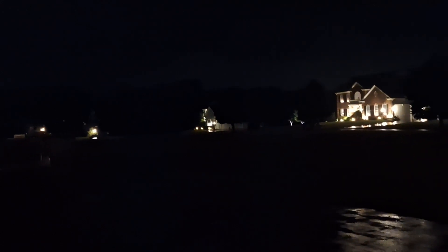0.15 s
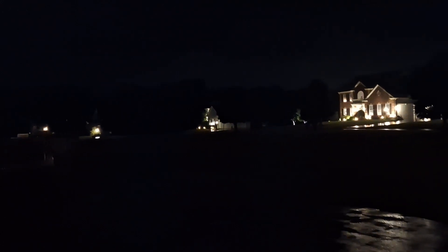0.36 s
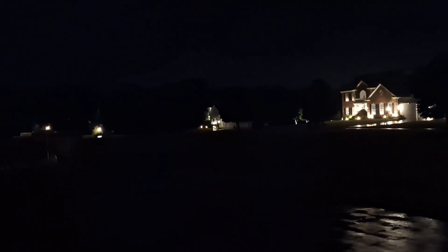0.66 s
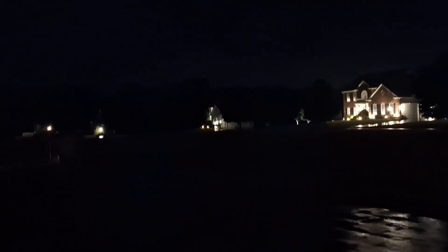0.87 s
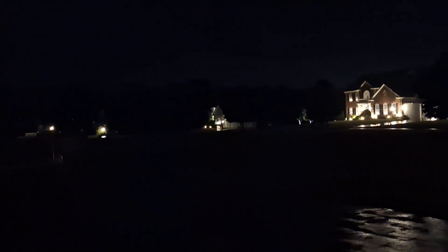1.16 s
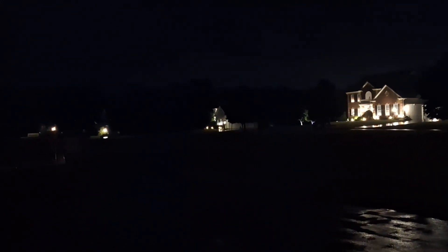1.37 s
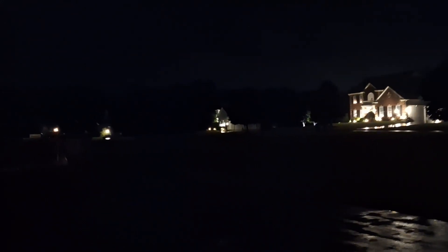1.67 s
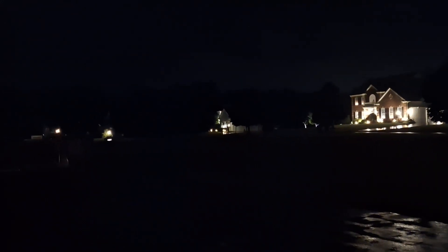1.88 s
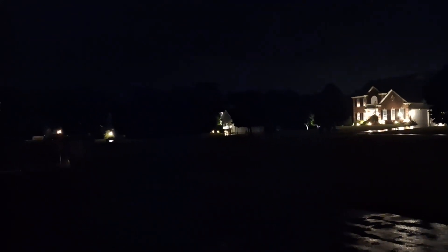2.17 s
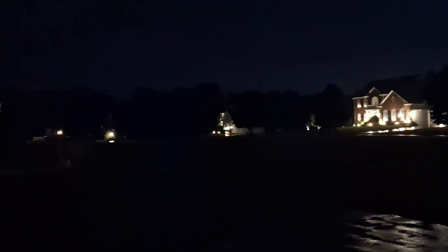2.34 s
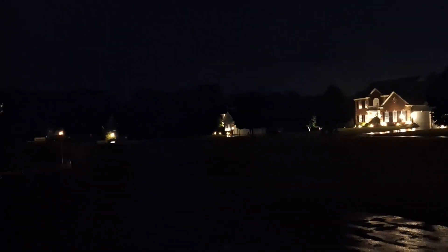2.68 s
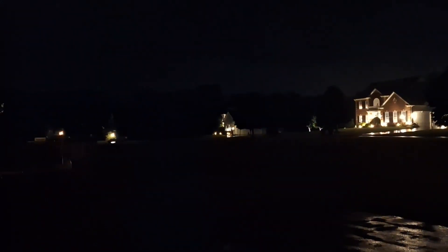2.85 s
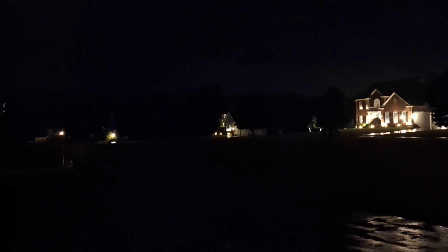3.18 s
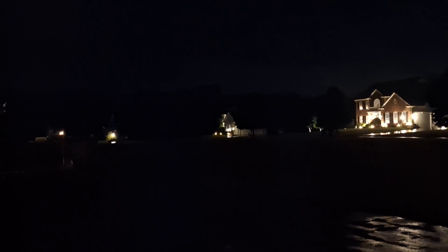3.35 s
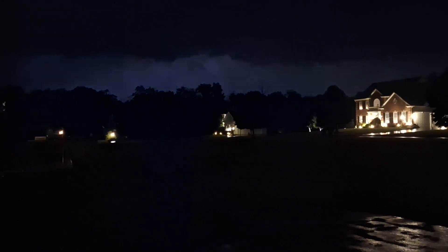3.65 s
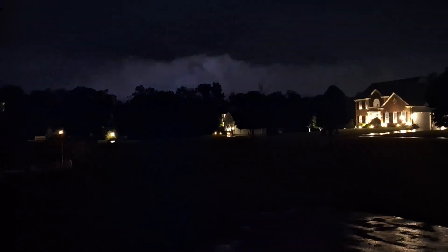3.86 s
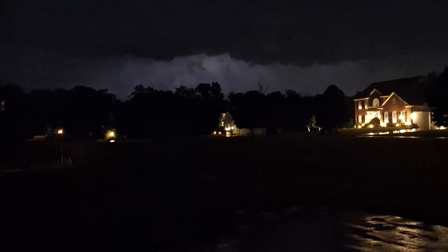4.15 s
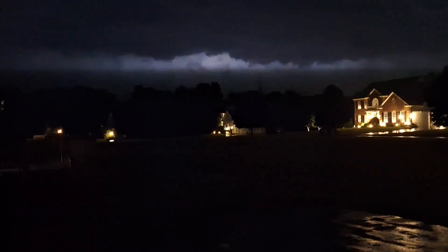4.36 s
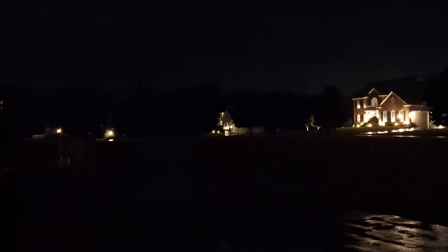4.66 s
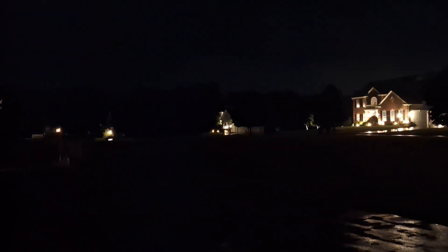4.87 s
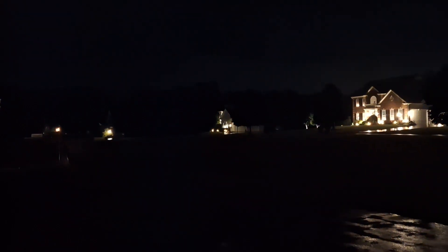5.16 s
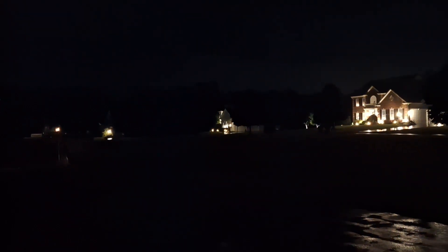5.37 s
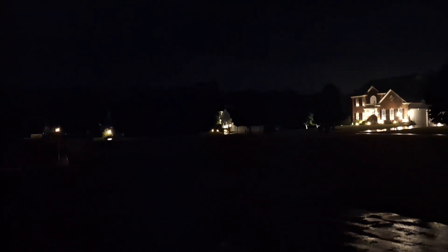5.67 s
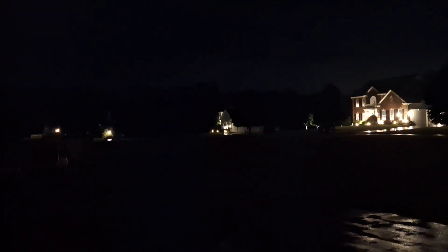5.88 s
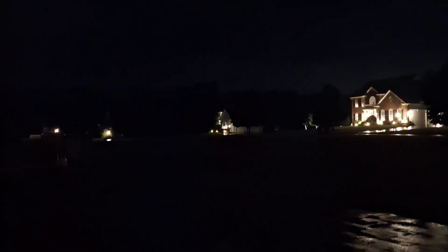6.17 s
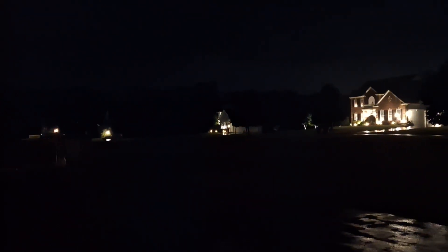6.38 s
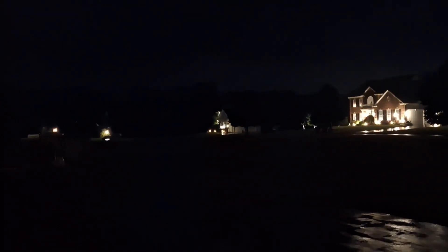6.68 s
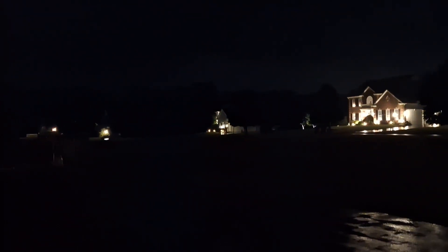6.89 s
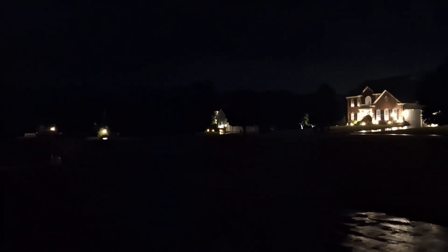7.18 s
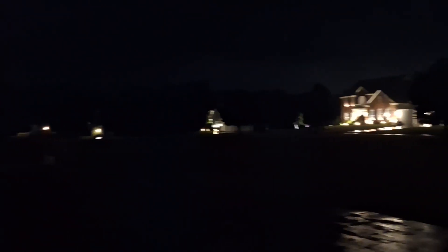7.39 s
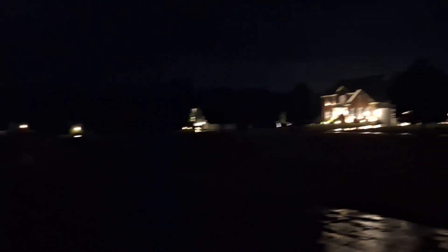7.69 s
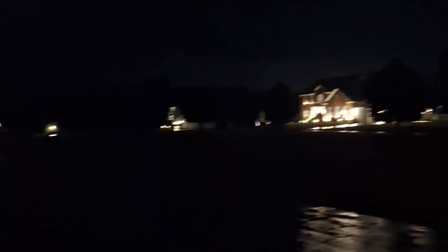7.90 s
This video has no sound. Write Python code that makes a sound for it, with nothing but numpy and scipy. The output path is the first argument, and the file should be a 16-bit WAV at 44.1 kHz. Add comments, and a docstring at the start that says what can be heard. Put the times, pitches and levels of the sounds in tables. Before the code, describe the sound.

Light rain drips close by over pulsing night crickets and a faint low rumble, then a heavy thunder roll booms and fades.

```python
"""On a porch at night in light rain: near drips over a soft wash, crickets in the grass, thunder.
Thunder is filtered noise: a far grumble, then a nearer roll with heavy booms shaped as short pulses.
Each drip, knock or rattle is a tick and a pitched noise burst; the rain is patchy noise with flashes.
Crickets are whistles, part clean and part blurred, cut into wing strokes.
The microphone has two ports facing different ways, which colour the treble differently."""
import sys
import numpy as np
from scipy import signal
from scipy.fft import rfft, irfft
from scipy.io import wavfile
from scipy.ndimage import uniform_filter1d

SR = 44100
rng = np.random.default_rng(int(sys.argv[2]) if len(sys.argv) > 2 else 0)


def wrap_up_sound(samples):
    """Save the sound to the file named by the first command line argument, as 16-bit audio."""
    columns = np.atleast_2d(samples).T
    # keep every value between -1 and 1, then stretch to whole-number steps
    tamed = np.clip(columns, -1, 1)
    steps = np.round(tamed * 32767).astype(np.int16)
    wavfile.write(sys.argv[1], SR, steps)


N = 354367
TIME = np.arange(N) / SR  # seconds


def gain_of(db):
    """Turns decibels into an amplitude gain."""
    return 10 ** (np.asarray(db) / 20)


def evened(x):
    """Scales a signal to rms 1."""
    return x / np.sqrt(np.mean(x ** 2) + 1e-20)


def read_curve(points, hz):
    """Reads a curve over frequency, straight between its points on a log-frequency axis."""
    point_hz, value = np.transpose(points)
    return np.interp(np.log(hz + 1), np.log(point_hz + 1), value)


def follow(rows):
    """Gives one value a sample for every column of a curve over time."""
    s, *columns = np.transpose(rows)
    return [np.interp(TIME, s, column) for column in columns]


def panned(left_minus_right_db):
    """Left and right gains; the right port stays at 1."""
    return gain_of(np.array([left_minus_right_db, 0 * left_minus_right_db]))


def resonate(x, hz, width_hz):
    """Resonance at one pitch: shifts hz down to zero, smooths twice and shifts back."""
    turn = np.exp(2j * np.pi * np.cumsum(hz * np.ones(x.shape[-1])) / SR)
    r = np.exp(-np.pi * width_hz / SR)
    lowered = x * turn.conj() + 1e-18
    smooth = signal.lfilter([(1 - r) ** 2], [1, -2 * r, r * r], lowered)
    return 2 * (turn * smooth).real


# How alike the two ports hear spread-out sound: pitch_hz, likeness (0-1)
PORT_LIKENESS = [(40, 0.96), (130, 0.98), (215, 0.89), (350, 0.95), (520, 0.78), (700, 0), (1100, 0.27),
                 (2500, 0), (16000, 0.06)]


def noise(spectrum, patchy_db, lo_hz=0, hi_hz=SR, size=N):
    """Two-port noise of rms 1 from random short-time spectra, with patches over time and pitch."""
    frames = size // 512 + 5
    hz = np.fft.rfftfreq(2048, 1 / SR)
    hz = hz[hz <= min(spectrum[-1][0], 3 * hi_hz)]
    a, b, c, d, patches = rng.standard_normal((frames, len(hz), 5), dtype=np.float32).T
    patches = uniform_filter1d(patches, size=20, axis=0)
    patches = evened(uniform_filter1d(patches, size=6, axis=1))
    same = np.clip(read_curve(PORT_LIKENESS, hz), 0, 1)[:, None]
    right = a + 1j * b
    left = same * right + np.sqrt(1 - same ** 2) * (c + 1j * d)
    band = 1 / np.sqrt((1 + (lo_hz / (hz + 1)) ** 12) * (1 + (hz / hi_hz) ** 12))
    colour = band[:, None] * gain_of(read_curve(spectrum, hz)[:, None] + patchy_db * patches)
    z = np.zeros((2, 1025, frames), np.complex64)
    z[:, :len(hz)] = np.array([left, right]) * colour
    sound = signal.istft(z, nperseg=2048, noverlap=1536)[1]
    return evened(sound[:, :size].astype(float))


# Colour of the far thunder: pitch_hz, level_db (relative, per Hz)
FAR_COLOUR = [(15, -51), (25, -16), (36, -7), (48, 0), (60, 1), (85, -7.5), (125, -12), (147, -20),
              (213, -21), (270, -26), (362, -23.5), (472, -31.5), (600, -34.5), (780, -55)]
FAR_DB, FAR_SWELL_DB = -50, 1


def far_grumble():
    """Low noise whose level swells at random, with four turning points a second."""
    swell = evened(np.interp(TIME, np.arange(40) / 4, rng.standard_normal(40)))
    return gain_of(FAR_DB + FAR_SWELL_DB * swell) * noise(FAR_COLOUR, patchy_db=0.0)


# Colour of the near roll, with the ring of the porch: pitch_hz, level_db (relative, per Hz)
NEAR_COLOUR = [(13, -43), (22, -23), (45, -7.5), (74, 3), (97, -6.5), (120, 0.5), (162, -17.5), (223, -3.5),
               (245, -17), (279, -19), (384, -15.5), (436, -25), (480, -22.5), (660, -32), (1000, -44.5),
               (1300, -51), (2200, -120)]
# Course of the near roll before lumps and claps:
# start_s, deep_db, middle_db (against deep), crackle_db (against deep)
NEAR_ROLL = [(5.4, -68, 3, -24), (5.73, -53, -10, -9.5), (6.05, -42.5, -4.5, -3.5), (6.07, -37, -1.5, -1),
             (6.22, -34.5, -3.5, -2.5), (6.27, -33.5, -6, -9.5), (6.4, -40, -8.5, -4.5),
             (6.7, -30, -6, -19), (6.84, -37.5, -9, -9.5), (7.0, -35, -4, -13), (7.18, -39, -13, -13),
             (7.22, -45.5, -6, -6), (7.34, -41.5, -10.5, -14.5), (7.72, -42.5, -7.5, -12),
             (8.04, -50.5, -5, -10.5)]
# Single shock fronts: start_s, level_db (peak), pitch_hz, cycles (count), clap_db (middle band)
SHOCK_FRONTS = [(6.075, -27.5, 109, 9, -32.5), (6.21, -27, 125, 2.4, -45), (6.30, -35, 70, 2.1, -53),
                (6.432, -23, 86, 5.7, -32), (6.491, -32, 96, 3.3, -39.5), (6.597, -23.5, 92, 1.9, -33),
                (6.632, -9.5, 95, 3, -25.5), (6.679, -23, 86, 2.4, -54), (6.722, -22.5, 74, 2.4, -44),
                (6.857, -17.5, 90.4, 4.7, -25.5), (6.924, -26, 100, 2.55, -42), (7.01, -22, 89, 5, -30.5),
                (7.053, -29, 93.5, 2.6, -46), (7.077, -28, 64, 2.1, -45), (7.256, -30.5, 75.5, 2, -41.5),
                (7.328, -31.5, 89, 6.3, -50), (7.41, -29.5, 80, 2.5, -53), (7.498, -35, 90, 3.5, -49),
                (7.634, -34, 85, 3, -50), (7.701, -32, 70, 2.4, -50), (7.811, -33.5, 96, 4.1, -44.5)]
CLAP_RISE_S, CLAP_T60_S = 0.0049, 0.31
CRACKLE_DB, CRACKLE_T60_S = -9, 0.46  # level against the clap
LUMPS_PER_S, LUMPS_DB = 30, 2


def near_roll():
    """Three noise bands swell in lumps; each shock front is a pulse with a brighter, dying clap."""
    start = round(NEAR_ROLL[0][0] * SR)
    t = TIME[start:]
    deep_db, middle_db, crackle_db = np.array(follow(NEAR_ROLL))[:, start:]
    middle_power = gain_of(deep_db + middle_db) ** 2
    crackle_power = gain_of(deep_db + crackle_db) ** 2
    fronts = np.zeros(len(t))
    for s, db, hz, cycles, clap_db in SHOCK_FRONTS:
        first = round(s * SR) - start
        span = slice(first, first + 20000)
        age = np.maximum(t[span] - s, 0)
        u = np.minimum(age * hz / cycles, 1)  # progress through the front, 0 to 1
        strength = np.sin(np.pi * u ** 0.69) ** 2.9  # strongest early
        fronts[span] -= gain_of(db) * strength * np.sin(2 * np.pi * cycles * u)
        onset = np.minimum(age / CLAP_RISE_S, 1)
        middle_power[span] += (onset * gain_of(clap_db - 60 * age / CLAP_T60_S)) ** 2
        crackle_power[span] += (onset * gain_of(clap_db + CRACKLE_DB - 60 * age / CRACKLE_T60_S)) ** 2
    roll = gain_of(deep_db) * noise(NEAR_COLOUR, 0, hi_hz=153, size=len(t))
    roll += np.sqrt(middle_power) * noise(NEAR_COLOUR, 0, lo_hz=158, hi_hz=278.5, size=len(t))
    roll += np.sqrt(crackle_power) * noise(NEAR_COLOUR, 0, lo_hz=298, size=len(t))
    # the lumps come in all bands at once
    lumps = rng.standard_normal(400)
    roll *= gain_of(LUMPS_DB * np.interp(t - t[0], np.arange(len(lumps)) / LUMPS_PER_S, lumps))
    fade_in = np.clip((t - t[0]) / 0.15, 0, 1)
    out = np.zeros((2, N))
    out[:, start:] = fade_in * roll + fronts
    return out


def thunder():
    """Far grumbling all through, with the nearer roll on top."""
    return far_grumble() + near_roll()


RISE_CYCLES = 1.7  # a strike takes this many cycles of its pitch to sound, at most those of 3000 Hz


def strike(db, hz, t60_s, splash, pan_db):
    """A sharp tick, then a burst ringing at one pitch with a broad splash, and a short porch tail."""
    t = np.arange(6000) / SR
    burst = rng.standard_normal((2, len(t)))
    f = np.fft.rfftfreq(len(t), 1 / SR)
    spray_colour = gain_of(read_curve(WASH_COLOUR, f)) * (f > 2000) * (f / 8000) ** 1.05
    spray = irfft(rfft(burst) * spray_colour)
    ring = resonate(burst, hz, 800 + 0.077 * hz)
    burst = evened(evened(ring) + splash * evened(spray))
    tick = 1.06 * np.exp(-t / 0.00052)
    # the tick is heard twice: direct and off the nearest wall
    shape = tick + 0.34 * np.roll(tick, round(0.0019 * SR))
    shape += 0.5 * gain_of(-60 * t / max(t60_s, 0.005))
    shape += gain_of(-21 - 60 * t / 0.3)  # porch tail
    shape *= np.sin(np.pi / 2 * np.minimum(t * max(hz, 3000) / RISE_CYCLES, 1)) ** 2
    shape *= signal.windows.tukey(2 * len(t), 0.3)[len(t):]  # fade-out
    return gain_of(db) * panned(pan_db)[:, None] * burst * shape


# Drips on hard ground close by: start_s, level_db, pitch_hz, splash (0-1), pan_db (left over right)
GROUND_DRIPS = [(.0205, -31.5, 5400, 0.27, -6), (0.0466, -41.5, 9400, 0.6, -3),
                (0.1367, -42, 11300, 0.6, -8.5), (0.176, -47.5, 6400, .7, 4), (.614, -47.5, 6160, .5, -11),
                (0.7665, -46, 6740, 1, -2), (1.0135, -44, 6100, 0.76, -3), (1.1393, -48, 9400, .8, 2),
                (1.252, -42, 5000, 0.2, -5), (1.5494, -39, 8900, 0.7, -5), (1.8947, -45, 10100, .3, -5),
                (2.002, -41, 9700, 1, 1), (2.4073, -40.5, 9800, .46, -10), (2.9608, -43.5, 10000, 0.8, 3),
                (3.144, -34.5, 9000, 0.63, -8), (3.1762, -47, 11100, .9, 2), (3.325, -33, 10040, 0.38, -4),
                (3.8661, -47, 9000, .5, -8), (4.145, -35, 6070, 0.6, -8), (4.377, -43.5, 10700, 0.7, 0),
                (4.8695, -40.5, 5870, 0.3, -7), (5.2197, -38.5, 9200, 0.5, -9),
                (5.234, -36.5, 6400, 0.8, -10), (5.3138, -46, 11000, 0.7, -3), (5.387, -43, 9650, 0.3, -7),
                (5.4809, -52, 9880, 1, 2), (6.0365, -46, 6340, 0.4, -3), (6.104, -44, 10200, 0, -3),
                (6.1505, -44, 5590, 0.6, 4), (6.1724, -46, 9300, .9, 3), (6.29, -47, 9370, .9, 0),
                (6.34, -33, 5400, 1, -7), (6.669, -36, 5600, 1, -2), (6.76, -47, 10100, .8, -12),
                (6.8435, -37, 5960, 0.2, -10), (6.98, -39.5, 10400, 0.5, -5),
                (7.5416, -36.5, 9200, 0.55, -6), (7.622, -33, 6530, 1, -5), (7.7276, -31.5, 5700, 0, -7),
                (7.8965, -39.5, 9630, 0.2, -11)]
# Hollow knocks, and longer rustles of something rattled by the thunder:
# start_s, level_db, pitch_hz, t60_s, splash (0-1), pan_db (left over right)
KNOCKS_AND_RATTLES = [(.6135, -43.5, 3820, 0.027, 0, -3), (5.2324, -39, 4150, 0.011, .1, -5),
                      (5.2547, -39, 4200, 0.083, 0.2, 2), (6.15, -44, 1740, 0.013, .6, 7),
                      (6.2347, -44.5, 1630, 0.0099, 0.2, 5.5), (6.3399, -31, 4600, 0.059, 0, 0),
                      (6.345, -52, 2320, 0.47, 0.1, 3.5), (6.357, -46.5, 1080, 0.26, 0, 0.5),
                      (6.69, -57, 1960, 0.35, 0.5, -3), (6.7668, -56.5, 2000, 0.36, .2, -5),
                      (7.515, -50, 4000, .06, .3, 0), (7.705, -46, 1980, 0.018, 0.2, 0),
                      (7.72, -35.5, 1395, 0.015, 0.33, -2)]
RING_CYCLES = 360  # a ground drip's ring dies 60 dB in this many cycles of its pitch
FAINT_PER_S, FAINT_DB, FAINT_HZ = 3, -50.5, 9740  # base level and pitch, spread at random


def drips_and_knocks():
    """Near drips, knocks and rattles sound one by one, and fainter drips land at random."""
    out = np.zeros((2, N + 6000))
    faint = []
    for a, b, c in rng.random((round(FAINT_PER_S * N / SR), 3)):
        # louder faint drips splash more
        faint.append((a * N / SR, FAINT_DB + 6 * b, FAINT_HZ * (0.994 + 0.085 * c), b, 0))
    ground = [(s, db, hz, RING_CYCLES / hz, splash, pan_db)
              for s, db, hz, splash, pan_db in [*GROUND_DRIPS, *faint]]
    for s, *row in [*ground, *KNOCKS_AND_RATTLES]:
        start = round((s + 0.00053) * SR)
        out[:, start:start + 6000] += strike(*row)
    return out[:, :N]


# Colour of the rain wash at the right port: pitch_hz, level_db (relative, per Hz)
WASH_COLOUR = [(300, 1), (500, 4), (850, 6.5), (1250, -3), (2100, -6), (2900, -2), (3500, 3.5), (5000, 2),
               (6400, 0.5), (7900, -14), (9300, -3), (10700, -6), (11800, -12.5), (13300, -20),
               (16000, -30)]
# Course of the upper wash, before a fixed 9.5 dB lift: start_s, level_db
FIZZ_COURSE = [(0, -68.5), (1.0, -70.5), (1.75, -70), (2.86, -70.5), (5.8, -69), (6.22, -64), (7.18, -68),
               (8.04, -67.5)]


def rain():
    """A patchy noise wash; small drops farther off flash up in wide bands of it."""
    low_wash = noise(WASH_COLOUR, patchy_db=2.0, hi_hz=1475) * gain_of(-64)
    fizz = noise(WASH_COLOUR, patchy_db=2.0, lo_hz=1410)
    t = np.arange(3000) / SR
    flash = gain_of(-60 * t / 0.15) * (1 - np.exp(-t / 0.0018))
    spray = noise(WASH_COLOUR, 0, lo_hz=2000)
    for lo_hz, hi_hz, db in ((2800, 12000, -10), (4850, 10900, -5.5), (8600, 21000, -13.5)):
        lands = rng.random(N) < 22 / SR  # about 22 drops a second in each band
        size = gain_of(3.0 * np.minimum(rng.exponential(1, N), 3)) * lands
        band = signal.butter(N=4, Wn=(lo_hz, hi_hz), btype="band", fs=SR, output="sos")
        flashes = signal.oaconvolve(size, flash)[:N] * signal.sosfilt(band, spray)
        fizz += gain_of(db) * evened(flashes)
    # the whole fizz stands some dB above its top octave
    return low_wash + gain_of(follow(FIZZ_COURSE)[0] + 9.5) * fizz


def singer(hz, width_hz, strokes_per_s, depth, clean, t=TIME):
    """A whistle, part clean and part blurred by distance, cut into wing strokes."""
    strokes = 1 - depth * (0.5 + 0.5 * np.cos(2 * np.pi * strokes_per_s * t))
    tone = np.sqrt(2) * np.sin(2 * np.pi * hz * t)
    blur = evened(resonate(rng.standard_normal((2, len(t))), hz, width_hz))
    return evened(strokes * (clean * tone + (1 - clean) * blur))


def phrases(rows, edge_s):
    """A gain that opens and closes with sloping edges for each phrase."""
    t = TIME[::64]
    gain = sum(gain_of(db) * np.clip(np.minimum(t - a, b - t) / edge_s, 0, 1) for a, b, db in rows)
    return np.interp(TIME, t, gain)


# Blurred cricket chorus, gain on two summed voices: start_s, level_db
CHORUS_COURSE = [(0, -64.5), (1.97, -62), (2.46, -65), (3.89, -61.5), (4.32, -66.5), (5.19, -61),
                 (5.55, -67.5), (6.0, -62), (6.67, -60.5), (7.09, -66), (7.61, -62), (8.04, -64.5)]


def chorus():
    """Two blurred, pulsing pitches stand for the crowd, stronger on the left."""
    crowd = singer(4433, 190, 35, 0.25, 0) + singer(4586, 210, 47, 0.26, 0)
    return gain_of(follow(CHORUS_COURSE)[0]) * panned(4.6)[:, None] * crowd


# Single crickets in front of the chorus, level before panning: start_s, end_s, level_db, pitch_hz
SOLO_PHRASES = [(.4, 0.715, -62, 4497), (.5, .85, -61.5, 4580), (.7, 0.997, -62, 4416),
                (1.802, 2.157, -59.5, 4625), (2.002, 2.45, -70, 4300), (2.944, 3.3, -65, 4650),
                (3.64, 4.185, -63, 4440), (4.47, 4.844, -64, 4590), (4.951, 5.3, -61.5, 4605),
                (5.859, 6.296, -59, 4600), (6.45, 6.95, -63.5, 4490), (7.35, 7.698, -70, 4600),
                (7.801, 8.1, -66, 4630)]
SOLO_PAN_DB = 10  # left over right


def solos():
    """Each phrase is one mostly blurred whistle with 44 strokes a second."""
    out = np.zeros((2, N))
    for a, b, db, hz in SOLO_PHRASES:
        span = slice(round(a * SR), round(a * SR) + 30000)
        voice = singer(hz, 56, 44, 0.37, clean=0.054, t=TIME[span])
        out[:, span] += phrases([(a, b, db)], 0.038)[span] * panned(SOLO_PAN_DB)[:, None] * voice
    return out


# Low trill, gain on two summed voices: start_s, end_s, level_db
TRILL_PHRASES = [(1.62, 3.72, -72.5), (5.08, 6.36, -70), (7.77, 8.1, -65)]


def low_trill():
    """Two close pitches share 56 strokes a second, one cut deeply and one lightly."""
    trill = singer(2560, 60, 56, 0.82, clean=0.6) + 0.82 * singer(2480, 80, 56, 0.32, clean=0.29)
    return phrases(TRILL_PHRASES, 0.14) * panned(-3.5)[:, None] * trill


# Short high chirps: start_s
CHIRP_STARTS = [.12, .6, 1.08, 1.55, 2.0, 2.42, 3.05, 3.75, 5.53, 6.2, 6.78, 7.45]
CHIRP_S, CHIRP_DB = 0.12, -65


def high_chirps():
    """Brief openings of one high whistle with 40 strokes a second."""
    chirps = [(s, s + CHIRP_S, CHIRP_DB) for s in CHIRP_STARTS]
    return phrases(chirps, 0.012) * singer(5670, 70, 40, 0.25, clean=0.43)


# Slowly pulsing cricket: start_s, end_s
TICKER_PHRASES = [(.05, .3), (.38, .95), (1.5, 1.7), (2.2, 2.35), (2.95, 3.22), (3.55, 3.8), (4.0, 4.1),
                  (4.45, 4.72), (4.9, 5.1), (5.37, 5.55), (5.6, 5.8), (6.2, 6.66), (7.23, 8.4), (7.75, 6.2)]
TICKER_DB = -66


def slow_ticker():
    """A mostly blurred high whistle with 26 strokes a second."""
    gain = phrases([(a, b, TICKER_DB) for a, b in TICKER_PHRASES], 0.03)
    return gain * singer(5325, 90, 26, 0.39, clean=0.08)


def crickets():
    """The chorus in the grass with single singers, a trill, chirps and a ticker."""
    return chorus() + solos() + low_trill() + high_chirps() + slow_ticker()


def scene():
    """Everything heard from the porch, before the microphone."""
    return thunder() + drips_and_knocks() + rain() + crickets()


# Left port against the right: pitch_hz, level_db
LEFT_COLOUR = [(60, 3), (220, 1.5), (520, 1.5), (1100, 0.5), (1900, -0.5), (2500, -6.5), (3600, -16.5),
               (4500, -14), (6400, -13.5), (7800, 3.5), (9400, -26), (11000, -12), (13000, -6.5),
               (15200, 10.5)]
# How far the left port lags: pitch_hz, lag_radians
LEFT_LAG = [(40, 0.31), (130, 0.58), (215, 0.25), (350, 0.7), (520, 1.11), (700, 2.15), (1100, 3.33)]
EDGE_HZ = 15780  # upper band limit


def record(dry):
    """The left port gets its colour and lag; deep bass is cut, hiss added, then the treble limited."""
    hz = np.fft.rfftfreq(4096, 1 / SR)
    response = gain_of(read_curve(LEFT_COLOUR, hz)) * np.exp(-1j * read_curve(LEFT_LAG, hz))
    port = np.roll(irfft(response), 2048) * np.hanning(4096)
    left = signal.oaconvolve(dry[0], port)[2048:2048 + N]
    bass_cut = signal.butter(N=3, Wn=39, btype="high", fs=SR, output="sos")
    ports = signal.sosfiltfilt(bass_cut, [left, dry[1]])
    ports = ports + gain_of(-81) * rng.standard_normal((2, N))  # hiss of the preamplifier
    band_limit = signal.firwin(511, EDGE_HZ, window=("kaiser", 9), fs=SR)
    return signal.oaconvolve(ports, band_limit[None], "same")


dry = scene()
out = record(dry)
wrap_up_sound(out)
```